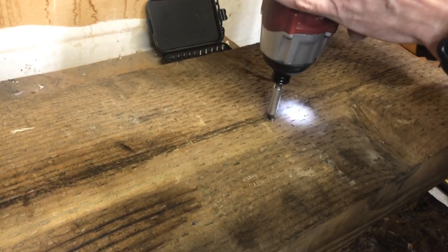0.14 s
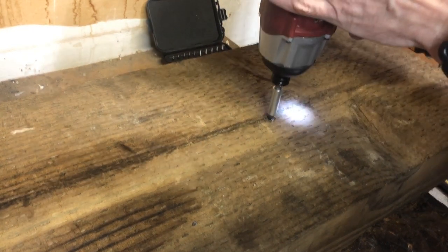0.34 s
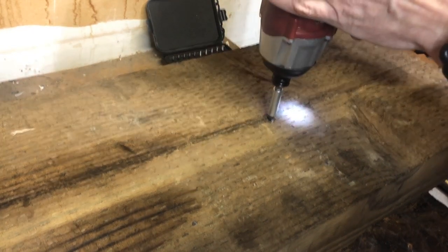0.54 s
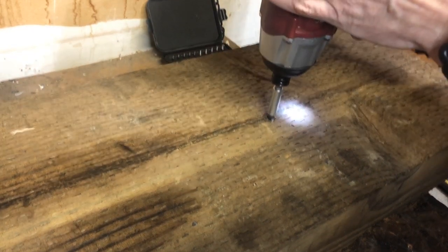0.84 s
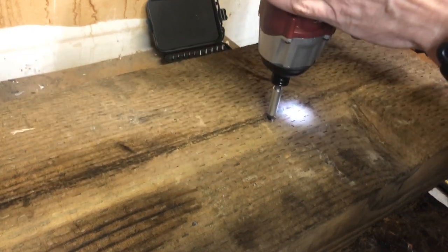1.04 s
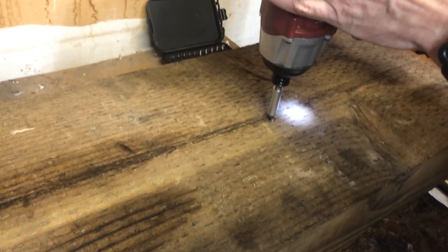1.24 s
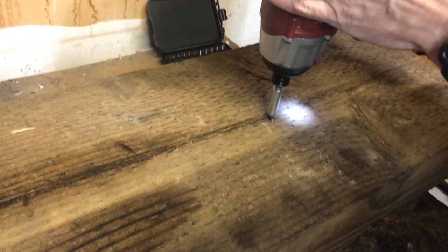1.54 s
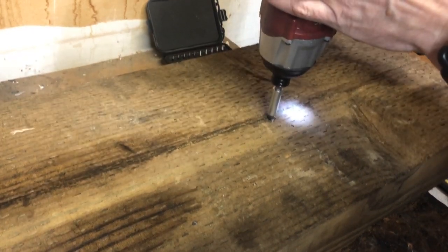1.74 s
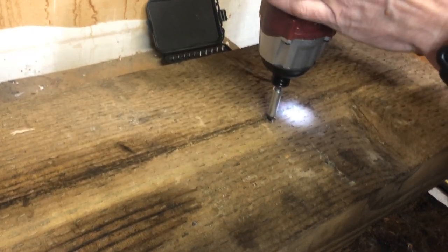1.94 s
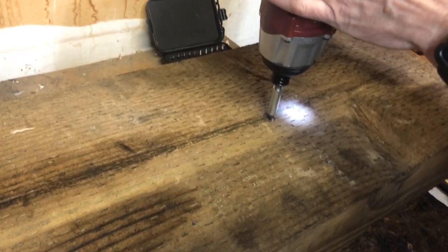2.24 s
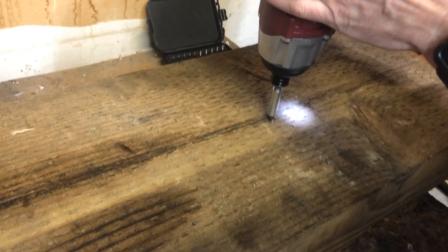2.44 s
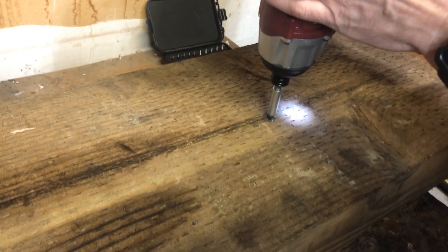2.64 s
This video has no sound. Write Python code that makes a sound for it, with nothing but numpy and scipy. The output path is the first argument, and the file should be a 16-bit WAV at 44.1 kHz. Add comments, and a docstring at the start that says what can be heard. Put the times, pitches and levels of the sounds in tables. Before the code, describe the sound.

A cordless impact driver starts up quickly and rattles hard on a wooden board, whining and slowly sinking

```python
"""The bit of a cordless impact driver spins in a screw head, scraping and knocking on a wooden board.
It catches at the same places in the turn and rattles the board's modes, hardest near the start.
The gears whine and the rotor hums at fixed multiples of the bit's turning: up in a quick run-up,
then slowly sinking under the load. Gearbox clatter and motor hiss grow with the speed.
A short wall echo and quiet workshop air lie behind."""
import sys
import numpy as np
from scipy import signal
from scipy.fft import rfft, irfft, next_fast_len
from scipy.io import wavfile
from scipy.ndimage import map_coordinates

SR = 44100
rng = np.random.default_rng(int(sys.argv[2]) if len(sys.argv) > 2 else 0)


def to_wav(s):
    """Save 16-bit WAV."""
    ch = np.atleast_2d(s).T  # columns
    pcm = np.round(np.clip(ch, -1, 1) * 32767)  # PCM
    wavfile.write(sys.argv[1], SR, pcm.astype(np.int16))


N = 123479
CLOCK = np.arange(N) / SR  # s


def amp(db):
    """Gain of a level in dB."""
    return 10 ** (np.asarray(db) / 20)


def unit(x):
    """Scale to rms 1."""
    return x / np.sqrt(np.mean(x ** 2) + 1e-20)


def curves(rows):
    """One value per sample for each column after the time."""
    s, *columns = np.transpose(rows)
    return [np.interp(CLOCK, s, column) for column in columns]


def noise():
    """White noise of rms 1."""
    return rng.standard_normal(N)


def wobble(rate):
    """A smooth random curve, rate knots a second."""
    knots = rng.standard_normal(int(N * rate / SR) + 4)
    return map_coordinates(knots, [np.arange(N) * rate / SR])


def filtered(x, response):
    """x times a response of frequency."""
    m = next_fast_len(N + SR // 2)
    return irfft(rfft(x, m) * response(np.fft.rfftfreq(m, 1 / SR)), m)[:N]


def coloured(x, points):
    """x through a spectrum of (frequency [Hz], gain [dB]) points."""
    f, db = np.transpose(points)
    return filtered(x, lambda hz: amp(np.interp(np.log(hz + 1), np.log(f), db)))


def taps(times, sizes):
    """Impulses at the given times."""
    return np.bincount(np.clip(np.round(times * SR).astype(int), 0, N), sizes, N + 1)[:N]


def decay(start_s, t60):
    """An envelope that starts at once and dies away."""
    t = CLOCK - start_s
    return (t >= 0) * amp(-60 * np.abs(t) / t60)


def surface(turn, size):
    """A random roughness of size points that comes round again with every turn."""
    return unit(map_coordinates(rng.standard_normal(size), [turn % 1 * size], mode="grid-wrap"))


def swell(turn, at, depth_db):
    """A gain that swings depth_db up and down once a turn, peaking at the given place for a positive depth."""
    return amp(depth_db * np.cos(2 * np.pi * (turn - at)))


TURN_ZERO_S = .4285  # turns are counted from this moment
# speed of the bit: (time [s], speed [turns/s])
BIT_SPEED = [(0.055, 3), (0.1, 17.8), (0.16, 23.4), (0.24, 25.98), (0.44, 26.15), (0.6, 26.4),
             (0.82, 25.08), (0.98, 25.39), (1.2, 24.76), (1.36, 24.62), (1.55, 24.43), (1.83, 24.68),
             (2.02, 23.88), (2.18, 24.06), (2.32, 23.46), (2.54, 23.25), (2.69, 22.25), (2.8, 23.1)]


def turning():
    """The bit's speed, summed into its angle in turns."""
    speed, = curves(BIT_SPEED)
    turn = np.cumsum(speed) / SR
    return speed, turn - np.interp(TURN_ZERO_S, CLOCK, turn)


# resonances of the wooden board: (centre [Hz], width [Hz], gain [dB])
BOARD_MODES = [(459, 118, -18), (576, 81, -16.5), (743.6, 25.3, -3.5), (803, 34, -4.5), (895, 46, -8),
               (933.5, 19.2, 1), (973.4, 22, -6.5), (1146, 98, -19.5), (1422, 40, -19), (1540, 25, -10),
               (1706, 48, -17)]


def board(x):
    """The board rings as parallel resonances of alternating sign."""
    def response(f):
        total = 0
        for k, (centre, width, db) in enumerate(BOARD_MODES):
            damping = 1j * f * width
            total = total + (-1) ** k * amp(db) * damping / (centre * centre - f * f + damping)
        return total
    return filtered(x, response)


LOWEST_ORDER, END_ORDER = 15, 71  # cycles per turn; the end is not included
FRICTION_NOISE_DB = 21.5  # over one plain harmonic
# force of the bit on the board: (time [s], level of one plain harmonic [dB])
BITE_FORCE = [(.05, -55), (.1, -39), (.15, -29), (.21, -23.5), (.26, -24.5), (.33, -29.5), (.4, -28.5),
              (.48, -27.5), (.6, -30), (.72, -25.5), (.85, -31), (1.12, -30.5), (1.27, -27.5), (1.5, -32),
              (1.68, -30), (1.85, -32), (2.02, -35.5), (2.2, -34), (2.55, -34.5), (2.8, -35.5)]
# harmonics of the scrape that stand out or are weak: (order [cycles per turn])
RIDGE_ORDERS = [28, 31, 32, 33, 34, 35, 36, 38, 40, 45]
# their levels, in the same order: (level over a plain harmonic [dB])
RIDGE_LEVELS = [8.5, -3.5, 5, -7, 1, -15, 4, 7, 5.5, 10]


def rattle(turn):
    """The bit scrapes over the same ridges in every turn; each harmonic swells as it glides across a board mode."""
    ridge_db = dict(zip(RIDGE_ORDERS, RIDGE_LEVELS))
    scrape = 0
    for order in range(LOWEST_ORDER, END_ORDER):
        scrape = scrape + amp(ridge_db.get(order, 0)) * np.sin(2 * np.pi * (order * turn + rng.random()))
    force = np.sqrt(2) * scrape + amp(FRICTION_NOISE_DB) * noise()
    return board(amp(curves(BITE_FORCE)[0]) * force)


# colour of steel, for the bit's clicks and the trigger: (frequency [Hz], gain [dB])
STEEL_COLOUR = [(300, -18), (1500, -8), (3200, 6), (4800, -7), (6700, 4), (8000, -2), (15000, -5)]


def steel_noise():
    """Bright noise with the colour of struck steel."""
    return unit(coloured(noise(), STEEL_COLOUR))


KNOCK_AT = -0.0256  # turns from the nearest half turn
SECOND_TURNS, SECOND_DB = .49, -8  # delay and level of the lighter knock that follows each one
THUMP_HZ, THUMP_RISE_S, THUMP_DB = 863, 0.0023, 1.5  # thump gain over the table
RING_DB, CLICK_T60_S = -4, 0.02  # ring gain over the table
# knocks of the bit: (time before snapping to a half turn [s], blow before its gains [dB], click [dB])
KNOCKS = [(.0675, -22.5, -23), (.106, -15.5, -18.5), (.1315, -9, -21), (.154, -7, -17), (.197, -9, -24),
          (.2355, -7.5, -30), (.274, -12, -36), (.3128, -9.5, -30), (.351, -14, -25), (.4275, -9.5, -31),
          (.4654, -6.5, -30), (.504, -9.5, -38), (.542, -11.5, -28), (.5797, -8, -26), (.618, -10.5, -33),
          (.656, -9.5, -26), (.812, -11.5, -29), (.892, -12.5, -32), (.932, -16, -36), (.971, -16.5, -30)]


def knocks(turn):
    """Knocks, mostly one a turn, thump and ring the board and click; a lighter one follows half a turn later."""
    s, blow_db, click_db = np.transpose(KNOCKS)
    knock_turn = np.round(2 * np.interp(s, CLOCK, turn)) / 2 + KNOCK_AT  # snapped to the nearest half turn
    knock_s = np.interp(knock_turn, turn, CLOCK)
    second_s = np.interp(knock_turn + SECOND_TURNS, turn, CLOCK)
    blows = taps(knock_s, amp(blow_db)) + taps(second_s, amp(blow_db + SECOND_DB))
    t = np.arange(SR // 10) / SR
    u = t / THUMP_RISE_S
    thump = (u * np.exp(1 - u)) ** 2 * np.sin(2 * np.pi * THUMP_HZ * t)
    thumps = signal.fftconvolve(blows, thump)[:N]
    single_ring = board(taps(np.zeros(1), np.ones(1)))
    ring = board(blows) / np.abs(single_ring).max()
    # the lighter knocks have no click
    click_envelope = signal.fftconvolve(taps(knock_s, amp(click_db)), amp(-60 * t / CLICK_T60_S))[:N]
    return amp(THUMP_DB) * thumps + amp(RING_DB) * ring + click_envelope * steel_noise()


def mesh(turn, order, rough):
    """One gear tone, order cycles per turn, with sidebands from uneven teeth and play."""
    phase = 2 * np.pi * order * turn + 0.45 * wobble(24.46)
    in_step, off_step = [0.46 * surface(turn, size=12) + wobble(260) for _ in range(2)]
    return unit((1 + rough * in_step / 2) * np.sin(phase) + rough * off_step / 2 * np.cos(phase))


LOW_GEAR_ORDER, HIGH_GEAR_ORDER, SIDE_GEAR_ORDER = 90, 135, 137  # cycles per turn
LOW_ROUGH, HIGH_ROUGH, RASP_ROUGH, SIDE_ROUGH = 0.26, 0.95, 16, 2.7
LOW_SWELL_AT, HIGH_SWELL_AT, HIGH_SWELL_DB = 0.55, 0.47, 2  # places in turns
RASP_DB = -6  # against the plain high tone
# low whine: (time [s], level [dB], depth of its beat [dB])
LOW_WHINE = [(.06, -72, 11), (.14, -51, -6), (.22, -30, 2), (.3, -29.5, 8.5), (.62, -30, 6), (.75, -29, -1),
             (1.05, -31.5, 4), (1.22, -37, 3), (1.48, -44, 8), (1.8, -44, 13), (1.98, -37.5, 3),
             (2.35, -33.5, 2.5), (2.56, -31.5, 0), (2.68, -24.5, -4), (2.8, -31, 0)]
# high whine with its rasp: (time [s], level [dB])
HIGH_WHINE = [(.06, -65), (.105, -34), (.13, -50), (.157, -26.5), (.2, -50), (.26, -40), (.62, -45),
              (.75, -43), (1.22, -46), (1.5, -27.5), (1.8, -39), (1.98, -25), (2.15, -28), (2.35, -23.5),
              (2.56, -24), (2.68, -25), (2.8, -25.5)]
# side tone above the high whine: (time [s], level [dB])
SIDE_WHINE = [(.06, -64), (.25, -42), (.6, -40), (.72, -31), (1.05, -35), (1.25, -34), (2.8, -43)]


def gears(turn):
    """The low whine beats once a turn; the high one twice, with a rasp round it and a side tone just above."""
    low_db, beat_db = curves(LOW_WHINE)
    low = unit(mesh(turn, LOW_GEAR_ORDER, LOW_ROUGH) * swell(turn, LOW_SWELL_AT, beat_db))
    rasp = mesh(turn, HIGH_GEAR_ORDER, RASP_ROUGH)
    high = mesh(turn, HIGH_GEAR_ORDER, HIGH_ROUGH) + amp(RASP_DB) * rasp
    high = unit(high * swell(2 * turn, 2 * HIGH_SWELL_AT, HIGH_SWELL_DB))
    side = mesh(turn, SIDE_GEAR_ORDER, SIDE_ROUGH)
    whines = amp(low_db) * low + amp(curves(HIGH_WHINE)[0]) * high
    return whines + amp(curves(SIDE_WHINE)[0]) * side


ROTOR_ORDER = 4  # cycles per turn of the bit
# main hum: (time [s], level [dB])
HUM = [(.06, -69), (.14, -39), (.25, -31.5), (.62, -28.5), (.82, -34.5), (1.02, -32.5), (1.2, -35),
       (1.6, -36.5), (1.85, -35), (2.02, -36.5), (2.45, -34), (2.8, -33.5)]
# weaker lines that follow the hum: (order [cycles per turn], level against the hum [dB])
HUM_LINES = [(2, -32), (6, -17), (10, -19.5), (16, -10)]
# overtones of the hum: (time [s], second harmonic [dB], third harmonic [dB])
HUM_OVERTONES = [(.06, -75, -86), (.25, -54, -46), (.7, -50, -46.5), (1.2, -60, -44.5), (1.9, -59, -45),
                 (2.1, -46.5, -61), (2.45, -50.5, -60), (2.8, -46, -50)]


def rotor(turn):
    """The slightly unbalanced rotor hums in sines locked to the turning."""
    phase = 2 * np.pi * ROTOR_ORDER * turn
    second_db, third_db = curves(HUM_OVERTONES)
    lines = sum(amp(db) * np.sin(2 * np.pi * (order * turn + rng.random())) for order, db in HUM_LINES)
    overtones = amp(second_db) * np.sin(2 * phase) + amp(third_db) * np.sin(3 * phase)
    return np.sqrt(2) * (amp(curves(HUM)[0]) * (np.sin(phase) + lines) + overtones)


CLATTER_SPEED, CLATTER_GRIT_DB = 24.6, 3  # turns/s at which the colour holds; depth of the grit
# colour of the gearbox clatter at CLATTER_SPEED: (frequency [Hz], gain [dB])
CLATTER_COLOUR = [(25, -14), (60, -13.5), (150, -8), (330, -10.5), (420, -2.5), (560, -1.5), (680, -2),
                  (1100, 0), (1330, -5.5), (1600, -7), (1850, -6.5), (2100, -1.5), (2400, 0.5), (2750, -4),
                  (3150, 1.5), (3550, -1), (3750, 0), (4050, -7.5), (4380, -0.5), (4650, -9), (5000, -8),
                  (9000, -11), (16000, -14)]


def clatter(turn):
    """Gritty gearbox noise, made at an even speed and then stretched so that it glides with the bit."""
    even_turn = turn[0] + CLATTER_SPEED * CLOCK
    grit = amp(CLATTER_GRIT_DB * surface(even_turn, size=24))
    even = coloured(noise() * grit + 0.64 * surface(even_turn, size=1024), CLATTER_COLOUR)
    position = (turn - turn[0]) / CLATTER_SPEED * SR
    return unit(map_coordinates(even, [position], mode="mirror"))


HISS_SWELL_AT, HISS_SWELL_DB, HISS_HALF_TURN_DB = 0.61, 1, 2  # place in turns; depths once and twice a turn
GRIT_DB, SHEEN_HZ = 1.7, 11000
# colour of the hiss: (frequency [Hz], gain [dB])
HISS_COLOUR = [(200, -46), (2500, -12), (5000, -3.5), (6800, 0), (7800, -0.5), (9000, -1), (11000, -1.5),
               (13500, 1), (15700, 0.5)]
# gain of the hiss above SHEEN_HZ: (time [s], gain [dB])
HISS_SHEEN = [(.1, -2.5), (.28, 3.5), (.7, -0.5), (1.3, 0), (1.6, 0.5), (2.8, 1)]


def hiss(turn):
    """Brushes and fan hiss grittily, pulsing once and twice a turn."""
    pulsing = swell(turn, HISS_SWELL_AT, HISS_SWELL_DB)
    pulsing = pulsing * swell(2 * turn, 2 * HIGH_SWELL_AT, HISS_HALF_TURN_DB)
    grit = amp(GRIT_DB * wobble(1600) + 0.64 * surface(turn, size=16))
    body = coloured(noise() * grit * pulsing, HISS_COLOUR)
    top = filtered(body, lambda hz: 1 - 1 / (1 + (hz / SHEEN_HZ) ** 10))
    return unit(body + (amp(curves(HISS_SHEEN)[0]) - 1) * top)


CLATTER_DB, HISS_DB, GEAR_OVERTONE_DB = -24, -24.5, -39  # at full speed
FULL_SPEED, SPEED_LAW = 23.5, 1.02  # turns/s, above which the level holds; power of the speed


def motor(turn, speed):
    """Clatter, hiss and a rasping overtone of the low gear, all growing with speed."""
    overtone = mesh(turn, 2 * LOW_GEAR_ORDER, rough=1.7)
    running = np.clip((speed - speed[0]) / (FULL_SPEED - speed[0]), 0, 1) ** SPEED_LAW
    mix = amp(CLATTER_DB) * clatter(turn) + amp(HISS_DB) * hiss(turn)
    return running * (mix + amp(GEAR_OVERTONE_DB) * overtone)


TRIGGER_S, TRIGGER_DB, TRIGGER_T60_S = 0.023, -46, 0.16
JOLT_S, JOLT_HZ, JOLT_DB, JOLT_T60_S = 0.067, 132, -34, 0.14


def start():
    """The trigger ticks in steel noise, then the housing jolts in a dying low tone as the motor takes off."""
    tick = amp(TRIGGER_DB) * decay(TRIGGER_S, TRIGGER_T60_S) * steel_noise()
    jolt_tone = np.sin(2 * np.pi * JOLT_HZ * (CLOCK - JOLT_S))
    return tick + amp(JOLT_DB) * decay(JOLT_S, JOLT_T60_S) * jolt_tone


ROOM_DB, ROOM_T60_S = -11, 0.25


def room(x):
    """Short answer of the nearby walls: a dying noise tail."""
    t = np.arange(SR // 4) / SR
    tail = rng.standard_normal(len(t)) * amp(-60 * t / ROOM_T60_S) * (t > .002)
    return amp(ROOM_DB) * signal.fftconvolve(x, tail / np.linalg.norm(tail))[:N]


AIR_DB = -52
# colour of the quiet workshop air: (frequency [Hz], gain [dB])
AIR_COLOUR = [(25, -6), (100, -6), (300, -23), (1000, -22), (5000, -25), (15000, -19)]


def air():
    """Steady coloured noise of the quiet workshop."""
    return amp(AIR_DB) * unit(coloured(noise(), AIR_COLOUR))


def scene():
    """The turning of the bit drives the tool's layers; all but the rotor hum also reach the walls."""
    speed, turn = turning()
    tool = rattle(turn) + knocks(turn) + gears(turn) + motor(turn, speed) + start()
    mono = tool + rotor(turn) + room(tool) + air()
    return np.array([mono, mono])


TOP_HZ = 15750


def record(dry):
    """Nothing passes above the band limit."""
    return np.array([filtered(channel, lambda hz: hz < TOP_HZ) for channel in dry])


dry = scene()
out = record(dry)
to_wav(out)
```